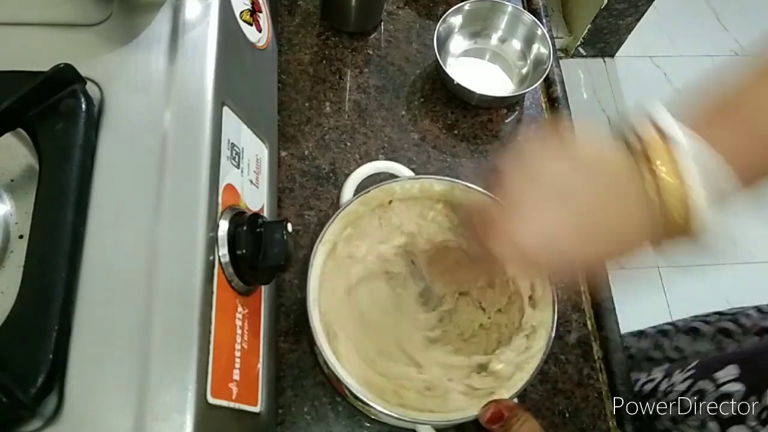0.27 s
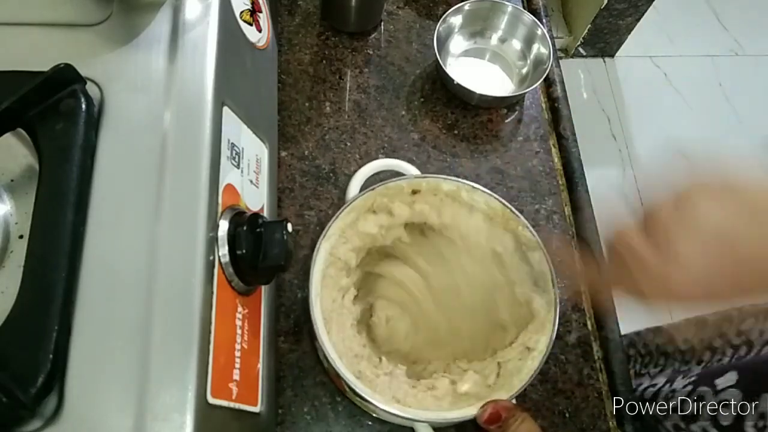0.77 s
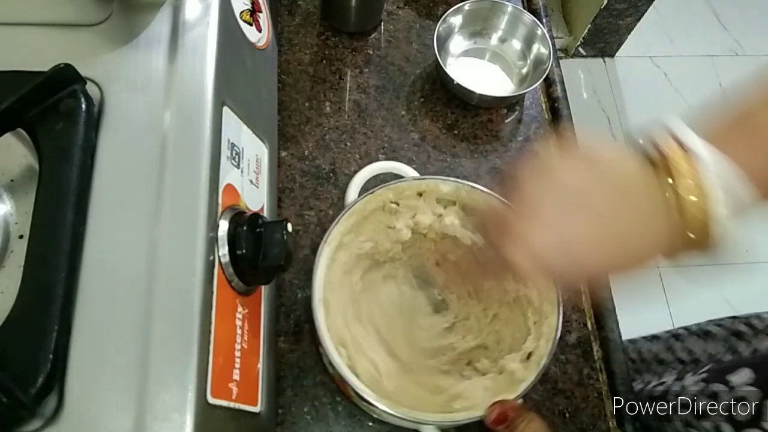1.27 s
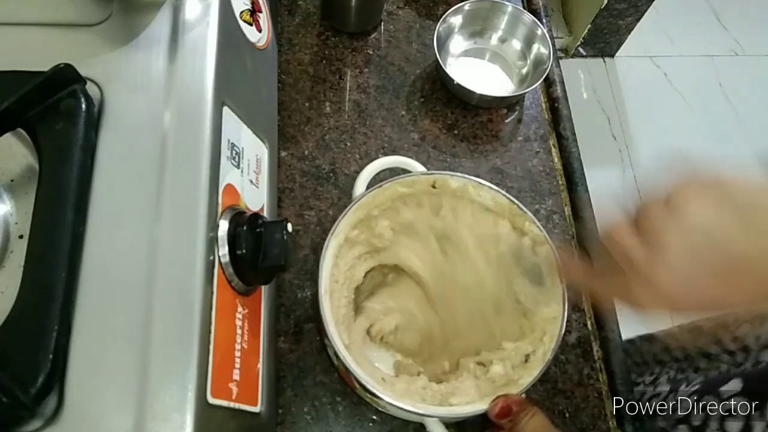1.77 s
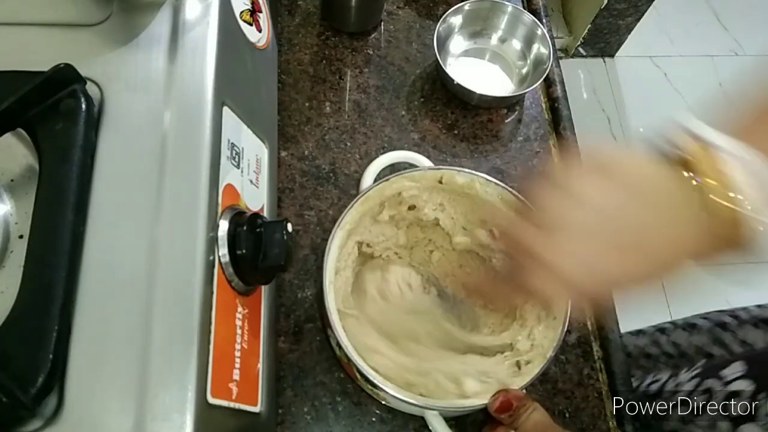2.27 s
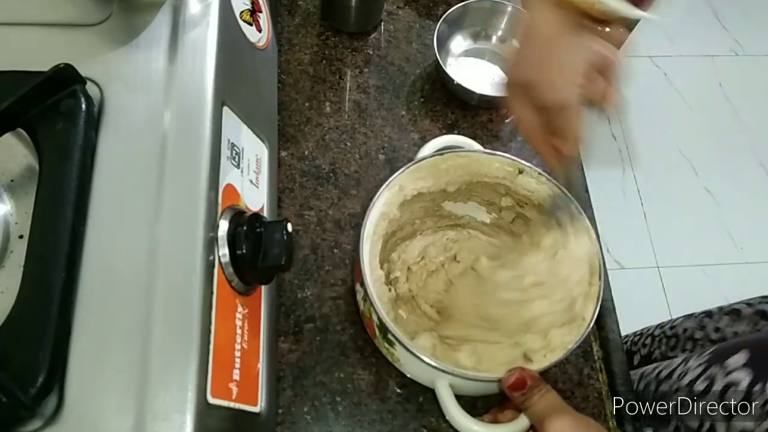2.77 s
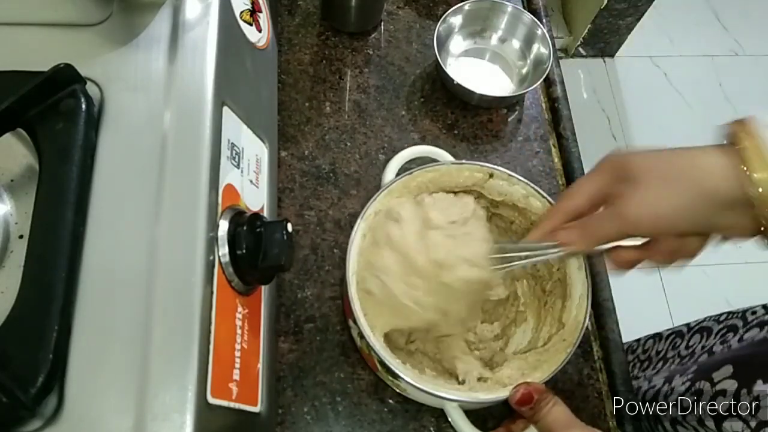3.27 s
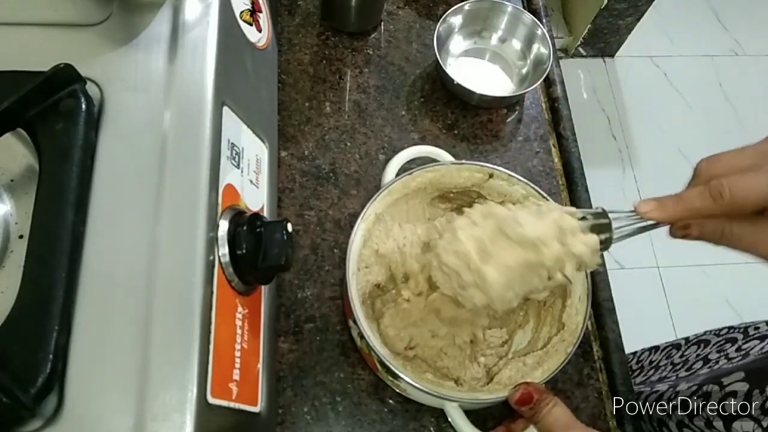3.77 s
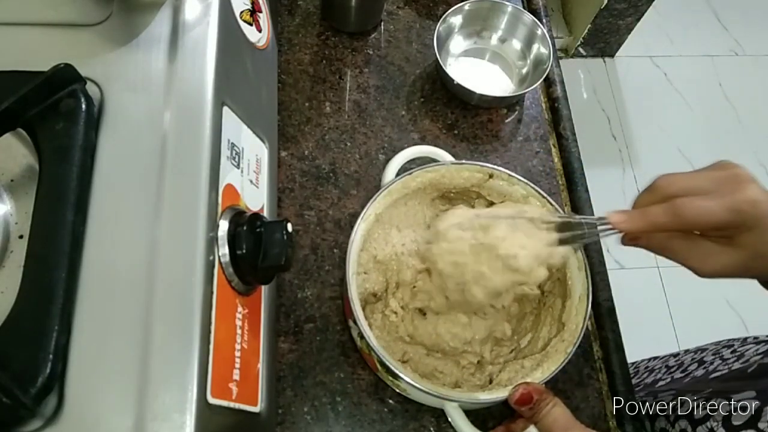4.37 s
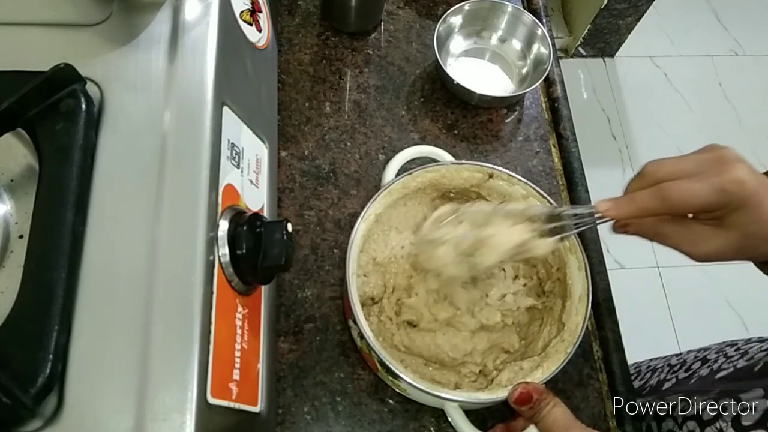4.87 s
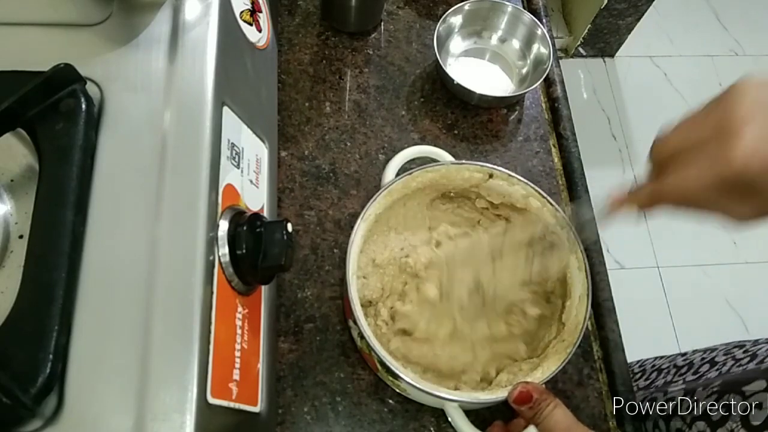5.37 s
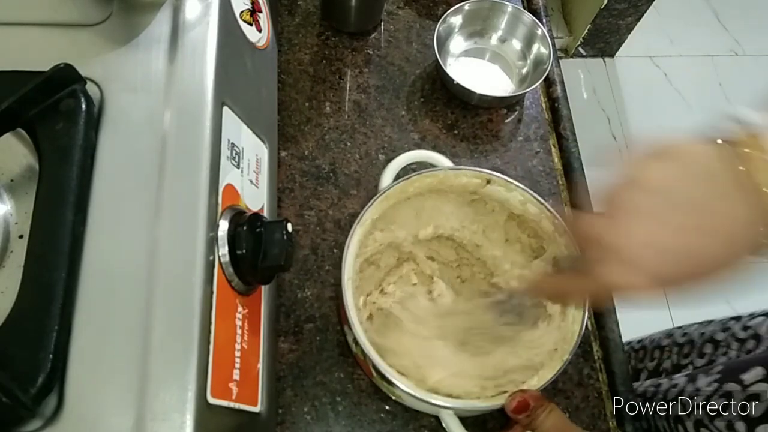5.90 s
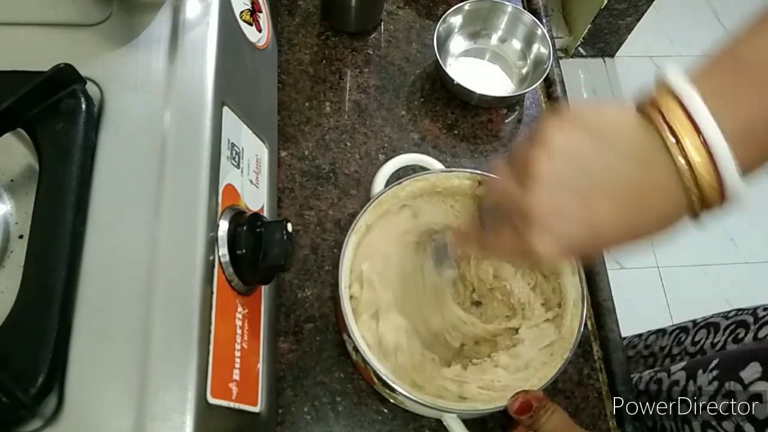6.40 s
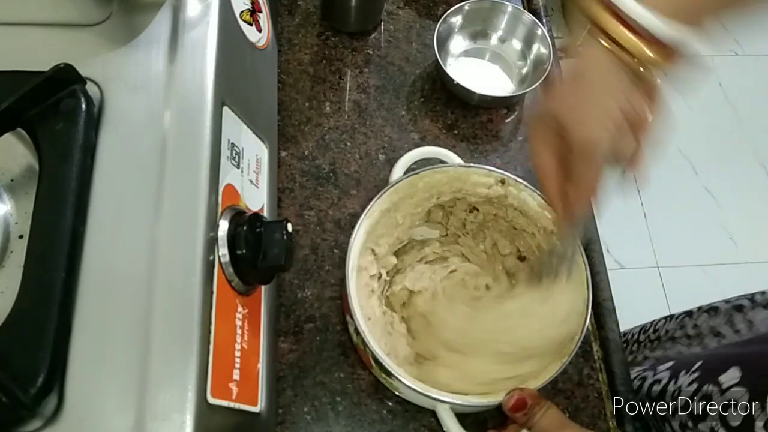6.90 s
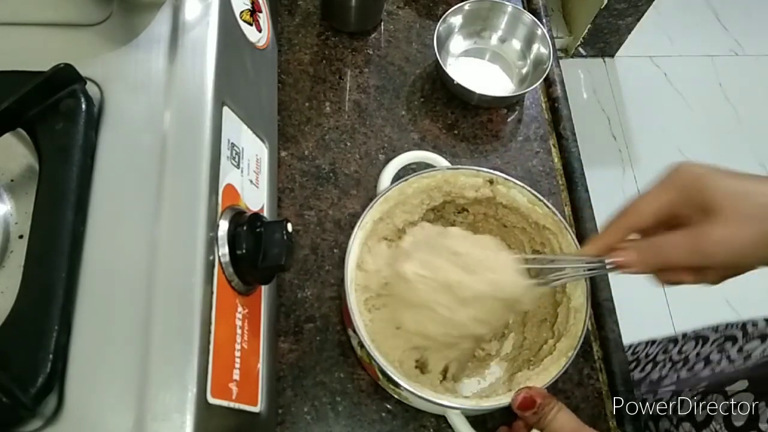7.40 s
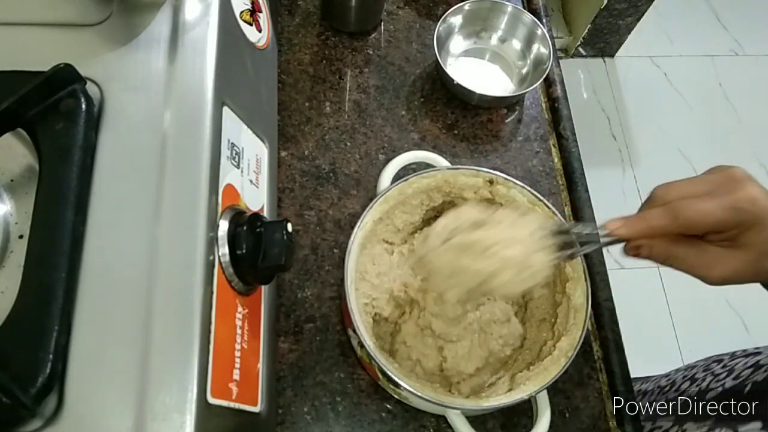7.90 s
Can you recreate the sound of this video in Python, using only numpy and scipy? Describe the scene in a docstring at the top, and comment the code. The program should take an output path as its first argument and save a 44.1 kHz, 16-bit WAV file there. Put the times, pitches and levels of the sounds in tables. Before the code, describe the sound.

Fast rhythmic whisking of heavy batter: low plops, gooey squelches, small pops and thin wire ticks, with hard bracelet clacks on top. The beating stops, leaving a quiet fridge hum and slight batter slides, broken by four evenly spaced steely knocks with dull thuds. The whisk scrapes the pot, circles again with two strong clacks, then lifts out. Close microphone, lively hard-walled kitchen.

```python
"""A wire whisk beats thick batter in a steel pot on a stone counter, about three turns a second, in a tiled kitchen.
Each turn plops (a decaying tone of falling pitch) and squelches (random grains, filtered and gated by the strokes).
Bangles on the beating wrist clack: short noise bursts with faint ringing modes; wires tick and scrape on the steel.
In a pause the loaded whisk is knocked clear with four jerks; a fridge hums in sine lines over a soft rush."""
import sys
import numpy as np
from scipy import signal
from scipy.fft import rfft, irfft
from scipy.io import wavfile
from scipy.ndimage import uniform_filter1d

SR = 44100
rng = np.random.default_rng(int(sys.argv[2]) if len(sys.argv) > 2 else 0)


def unload_wav(signal):
    """Save mono or channel-first audio to the path in sys.argv[1] as 16-bit WAV at rate SR, clipped to [-1, 1]."""
    wavfile.write(
        sys.argv[1],
        SR,
        np.round(np.clip(np.atleast_2d(signal).T, -1, 1) * 32767).astype(np.int16),
    )


N = 359363
TIME = np.arange(N) / SR

# Low thuds of whisk and pot: plunges into the batter, and from 4.6 to 5.2 s the thuds of the knocks.
# Each row: start in seconds, base level in dB, pitch in Hz to which the tone falls,
# base level of the wet slap in dB relative to the thud.
LOW_THUDS = [(0.045, -30, 442, 0.5), (0.372, -21.5, 439, -7.5), (0.716, -25, 427, -28),
             (0.804, -21.5, 434, -3.5), (1.054, -27.5, 478, -3.5), (1.374, -29.5, 505, -19),
             (1.469, -35, 356, -5), (1.715, -32, 325, -18.5), (2.041, -34, 490, 4), (2.092, -28, 420, -5),
             (2.124, -29.5, 376, -6), (2.523, -38.5, 310, 7.5), (2.926, -36, 280, -19),
             (4.609, -29.5, 270, -8.5), (4.812, -29, 298, -9.5), (4.994, -26.5, 295, -4.5),
             (5.163, -28, 269, -13.5), (6.081, -32, 425, -14.5), (6.47, -36.5, 484, -1.5),
             (6.83, -42.5, 400, -22)]
# The whisk circling in the batter. Each row: start in seconds, end in seconds,
# base level of the squelch in dB, base level of the wet crackle in dB.
CIRCLING_BOUTS = [(0, 3.13, -56, -54.5), (5.779, 7.2, -62.5, -56)]
# Spectrum of wire contacts. Each row: frequency in Hz, relative level in dB.
WIRE_COLOUR = [(40,-62),(300,-26.5),(1500,-15.5),(2600,-11.5),(4100,-2),(5200,-8.5),(7400,9.5),(9000,-3),(11000,-20.5),(15500,-38)]
# a pull takes hold at once; a bout dies away as the batter closes behind the wires
PULL_ATTACK_S, BOUT_T60_S = 0.014, 0.43


def undb(db):
    """Level law: decibels to amplitude gain."""
    return 10 ** (np.asarray(db) / 20)


def unit(x):
    """Power normalisation: scale to rms 1."""
    return x / np.sqrt(np.mean(x ** 2))


def fade(t, t60):
    """Exponential decay: amplitude falls by 60 dB in t60, in the unit of t."""
    return np.exp(-np.log(1000) * t / t60)


def add(track, s, sound):
    """Superposition: mix a sound into the track from s seconds on."""
    start = max(int(s * SR), 0)
    track[start:start + len(sound)] += sound[:max(N - start, 0)]


def on_log_axis(hz, points):
    """Log-frequency interpolation of (Hz, value) points."""
    points = np.array(points)
    return np.interp(np.log(np.maximum(hz, 1)), np.log(points[:, 0]), points[:, 1])


def colour(x, points, tilt=0, size=1024):
    """Minimum-phase filtering: a causal response with the given spectrum, tilted in dB per octave above 2 kHz."""
    hz = np.fft.rfftfreq(size, 1 / SR)
    db = on_log_axis(hz, points) + tilt * np.log2(np.maximum(hz, 2000) / 2000)
    # folding the cepstrum onto positive time makes the response causal
    cepstrum = irfft(np.log(undb(db)))
    cepstrum[1:size // 2] *= 2
    cepstrum[size // 2 + 1:] = 0
    response = irfft(np.exp(rfft(cepstrum)))
    return signal.fftconvolve(x, response)[:len(x)]


def resonate(x, hz, width_hz):
    """Damped resonance: one peak filter, applied twice for steep sides."""
    b, a = signal.iirpeak(hz, hz / width_hz, fs=SR)
    return signal.lfilter(b, a, signal.lfilter(b, a, x))


def walk(rate):
    """Slow random modulation: random values, rate per second, joined smoothly and scaled to rms 1."""
    k = int(SR / rate)
    steps = np.repeat(rng.standard_normal(N // k + 1), k)
    return unit(uniform_filter1d(steps, k)[:N])


def grains(rate, spread_db):
    """Shot noise: random single impulses, a few of them much larger than the rest."""
    sizes = undb(spread_db * np.minimum(rng.exponential(size=N), 4.5))
    return (rng.random(N) < rate / SR) * sizes * rng.choice([-1, 1], N)


def shifting(rate, spread_db, own_db, count=9):
    """Independent band modulation: each band of the grains swells and sinks by itself as gaps open and close."""
    source = grains(rate, spread_db)
    edges = np.geomspace(100, 16000, count + 1)
    total = np.zeros(N)
    for band in zip(edges[:-1], edges[1:]):
        sos = signal.butter(2, band, "band", fs=SR, output="sos")
        total += signal.sosfilt(sos, source) * undb(own_db * walk(30))
    return total


def crack(points, t60, tilt=0, size=2048, count=4):
    """Hard impact: brief chatter with an even spectrum, then coloured and scaled to a fixed energy."""
    decay = fade(TIME[:size], t60)
    burst = rng.standard_normal(size)
    for _ in range(count):
        # keep only the phases, so that every frequency is equally strong
        phase = np.angle(rfft(np.sign(burst) * decay))
        burst = irfft(np.exp(1j * phase))
    burst = colour(burst * np.sqrt(decay), points, tilt)
    return burst / np.sqrt(np.sum(burst ** 2) / 10)


def bubble(hz, cycles):
    """Bubble resonance: an air pocket bursting in thick batter gives a few cycles that rise a little."""
    turns = hz * TIME[:SR // 20]
    return np.sin(2 * np.pi * turns * (1 + 0.12 * turns / cycles)) * fade(turns, cycles)


def swell(start, length, attack_s, t60):
    """Movement envelope: linear attack, hold and exponential release."""
    return np.clip((TIME - start) / attack_s, 0, 1) * fade(np.maximum(TIME - start - length, 0), t60)


def circling():
    """Gating by motion: 1 while the whisk goes round in the batter, dying towards 0 when it is lifted."""
    return sum(swell(start, end - start, PULL_ATTACK_S, BOUT_T60_S) for start, end, _, _ in CIRCLING_BOUTS)


def slipping():
    """Gravity-driven sliding: gain of the lumps leaving the lifted whisk."""
    # Each row: start in seconds, length in seconds, base level in dB.
    sliding_lumps = [(3.419, 0.42, -69), (4.058, 0.081, -66.5), (4.47, 0.26, -73), (5.499, 0.35, -74.5),
                     (7.225, 0.28, -63), (7.639, 0.16, -64.5)]
    attack_s, t60_s = 0.02, 0.2
    return sum(undb(db) * swell(s, length, attack_s, t60_s) for s, length, db in sliding_lumps)


def stirring():
    """Work against viscosity: gains of squelch and crackle, steady in each bout, surging with each pull."""
    # Strokes through the thick of the batter. Each row: start in seconds, length of the pull in seconds,
    # base level of the squelch in dB, base level of the wet crackle in dB.
    pull_strokes = [(.042, 0.062, -45, -45), (.37, 0.095, -47.5, -47), (.713, 0.049, -46, -46.5),
                    (1.05, 0.059, -45, -47), (1.383, 0.076, -46.5, -51), (1.712, 0.071, -45, -48),
                    (2.043, 0.047, -47.5, -51), (2.52, 0.025, -53, -47), (2.922, 0.34, -53.5, -59.5),
                    (6.086, .11, -48, -44.5), (6.467, .11, -47.5, -51), (6.92, 0.29, -51.5, -64.5)]
    pull_t60_s = 0.54
    steady = sum(np.outer(undb(dbs), swell(start, end - start, PULL_ATTACK_S, BOUT_T60_S))
                 for start, end, *dbs in CIRCLING_BOUTS)
    pulls = sum(np.outer(undb(dbs), swell(s, length, PULL_ATTACK_S, pull_t60_s))
                for s, length, *dbs in pull_strokes)
    return np.hypot(steady, pulls)


def fridge(air_db=-60, waver_db=1):
    """Tonal machine noise: wavering compressor lines over a soft rush with a whistling band near 2 kHz."""
    # Level of the hum. Each row: time in seconds, level in dB.
    hum_level = [(0,-56),(5.3,-55.5),(8.15,-62)]
    # Compressor lines. Each row: frequency in Hz, level in dB relative to the hum level.
    hum_lines = [(74.4,-3.5),(121.8,-4.5),(100,-19),(226,-15),(247,-14)]
    # Spectrum of the rush. Each row: frequency in Hz, relative level in dB.
    air_colour = [(25,-14),(42,-13),(70,-8),(130,-1),(240,-4),(380,-8.5),(700,-13.5),(950,-32.5),(1150,-32),(1450,-42),(1800,-21.5),(2120,-11),(2550,-40),(4000,-60),(8000,-52.5),(15000,-69.5)]
    hum = np.zeros(N)
    for hz, db in hum_lines:
        gain = undb(db + waver_db * walk(3.3)) * np.sqrt(2)
        hum += gain * np.sin(2 * np.pi * hz * TIME + 0.15 * walk(6.7))
    shape = undb(on_log_axis(np.fft.rfftfreq(N, 1 / SR), air_colour))
    air = irfft(rfft(rng.standard_normal(N)) * shape, N)
    return undb(np.interp(TIME, *np.transpose(hum_level))) * hum + undb(air_db) * unit(air)


def kitchen(x, build_s=0.0005, early_db=3.5, early_t60=0.04, count=10, size=16384):
    """Diffuse reverberation: dense noise echoes, stronger early on, each band decaying at its own rate."""
    # Decay of the tiled room. Each row: frequency in Hz, t60 in seconds.
    room_decay = [(100,0.93),(400,0.65),(1400,0.99),(4000,0.6),(7000,0.73),(10000,0.38),(15000,0.6)]
    t, hz = TIME[:2 * size], np.fft.rfftfreq(2 * size, 1 / SR)
    centres = np.geomspace(100, 16000, count)
    bands = np.array([np.interp(hz, centres, share) for share in np.eye(count)])
    decay = fade(t, on_log_axis(centres, room_decay)[:, None])
    decay = decay * np.minimum(t / build_s, 1) ** 2 * undb(early_db * fade(t, early_t60))
    out = np.zeros(N)
    # the hand keeps moving, so the fine pattern of echoes changes from turn to turn
    for centre in range(0, N + size // 2, size // 2):
        near = np.arange(max(centre - size // 2, 0), min(centre + size // 2, N))
        response = np.sum(irfft(rfft(rng.standard_normal(len(t))) * bands) * decay, axis=0)
        response /= np.sqrt(np.sum(response ** 2))
        part = x[near] * np.cos(np.pi * (near - centre) / size)
        add(out, near[0] / SR, signal.fftconvolve(part, response))
    return out


def bangles(clack_db=0, clack_t60=0.021, ring_db=-41, rattle_per_s=160):
    """Modal ringing after impact: each clack excites the modes differently; a fast rattle modulates the ring."""
    # Clacks. Each row: start in seconds, level in dB, brightness in dB per octave above 2 kHz.
    bangle_clacks = [(0.1075, -11, 1), (0.1122, -7.5, 4), (0.4376, -11.5, 2.1), (0.4492, -6.5, 3.3),
                     (0.4583, -22, 0.5), (0.7742, -18, 3), (0.7889, -11.2, -1.3), (0.8057, -30.5, -14.5),
                     (1.1001, -13.5, 5.0), (1.1261, -26, -8), (1.3866, -25, -5), (1.4422, -13, 2.5),
                     (1.4585, -12.5, 3.5), (1.7821, -12.5, 5), (2.1167, -13.5, 2.5), (2.1244, -8.5, -1),
                     (2.433, -17.5, 2.5), (2.4648, -16, 1), (6.128, -6, 4.5), (6.4944, -28.5, 3),
                     (6.5063, -5.5, 3.5), (6.518, -19.5, -4)]
    # Ringing modes. Each row: centre of the random frequency in Hz, base level in dB, t60 in seconds.
    ring_modes = [(4050,-15.5,0.13),(5660,16.5,0.4),(5500,-8,0.23),(6960,11,0.13),(6850,5,.2),(7920,-14.5,.2),(8210,-6.5,.2),(9000,-9,.25),(8900,-13.5,.25),(12900,-6,.15)]
    # Spectrum of a clack. Each row: frequency in Hz, relative level in dB.
    clack_colour = [(40,-59),(150,-3),(500,-26),(1400,-17),(2700,-19),(3700,-12.5),(5200,-6.5),(6700,-1),(8000,-1),(9600,-6),(11200,-15.5),(13000,-15),(15500,-27)]
    out, rings, t = np.zeros(N), np.zeros(N), TIME[:SR // 2]
    for s, db, tilt in bangle_clacks:
        chance = rng.standard_normal((len(ring_modes), 2))
        ring = np.zeros(len(t))
        for (hz, mode_db, t60), (strength, detune) in zip(ring_modes, chance):
            tone = np.sin(2 * np.pi * hz * (1 + 0.008 * detune) * t)
            ring += np.tanh(strength) * undb(mode_db) * fade(t, t60) * tone
        add(out, s, undb(db + clack_db) * crack(clack_colour, clack_t60, tilt))
        add(rings, s, undb(db + ring_db) * ring / 2)
    return out + rings * walk(rattle_per_s)


def whisk_knocks(knock_db=0, knock_t60=0.015):
    """Heavily damped impact: short steel knocks, choked at once by the batter on the wires."""
    # Knocks that clear the whisk. Each row: start in seconds, level in dB.
    clearing_knocks = [(4.6115, -7.5), (4.8057, -26), (4.8121, -5.5), (4.9947, -20.5), (5.162, -8.5)]
    # Spectrum of a knock. Each row: frequency in Hz, relative level in dB.
    knock_colour = [(40,-82),(200,-27),(520,-10.5),(900,-28.5),(1700,-22.5),(2600,-30.5),(3700,-21),(4300,-12.5),(5300,-10.5),(5900,-6),(7500,-1),(8700,-13.5),(10700,-18.5),(15500,-37)]
    out = np.zeros(N)
    for s, db in clearing_knocks:
        add(out, s, undb(db + knock_db) * crack(knock_colour, knock_t60))
    return out


def pot_thumps(thump_db=-4.5, thump_hz=280, thump_t60=0.04):
    """Damped oscillation: every plunge and every knock of the whisk also thumps the pot against the counter."""
    out, t = np.zeros(N), TIME[:SR // 8]
    thump = np.sin(2 * np.pi * thump_hz * t) * fade(t, thump_t60) * (1 - fade(t, 0.0096))
    for s, db, _, _ in LOW_THUDS:
        add(out, s + rng.uniform(0, 0.008), undb(db + thump_db) * thump)
    return out


def scrapes(scrape_db=0):
    """Friction noise: a fine, bright rub swells and fades as the wires sweep round the bare pot wall."""
    # Sweeps. Each row: start in seconds, end in seconds, level in dB.
    wall_sweeps = [(5.716,6.062,-56),(6.823,7.02,-53)]
    # Spectrum of the rub. Each row: frequency in Hz, relative level in dB.
    rub_colour = [(500,-22),(2600,-10.5),(4500,1),(8000,3),(11000,-5.5),(13000,-10.5),(15500,-8)]
    sweep = np.zeros(N)
    for start, end, db in wall_sweeps:
        progress = np.clip((TIME - start) / (end - start), 0, 1)
        sweep += undb(db) * np.sqrt(np.abs(np.sin(np.pi * progress)))
    return undb(scrape_db) * sweep * unit(colour(grains(6000, 3.7), rub_colour))


def wire_ticks(tick_db=-1, tick_t60=0.014, stray_tilt=0.5):
    """Light random impacts: wires touch each other and the pot wall, by chance too while the whisk circles."""
    # The clearest ticks. Each row: start in seconds, base level in dB, brightness in dB per octave above 2 kHz.
    clear_ticks = [(0.373, -29, 8), (0.393, -23, 6.5), (0.7148, -27.5, -9), (0.7355, -25.5, 12),
                   (1.0546, -29, 17), (1.2313, -25, -5.0), (1.4003, -25, 4.5), (2.043, -31, 5),
                   (2.06, -25, -3), (2.351, -26, 0.5), (2.965, -27.5, 16), (3.156, -28.5, 2),
                   (3.422, -40.5, 13), (4.0628, -41, 0.5), (4.4744, -40, 15), (5.585, -37, 1.5),
                   (5.992, -25.5, 1), (6.0898, -24, -4.5), (6.3435, -33, -2.5), (7.1851, -47, 9),
                   (7.371, -47, 10), (7.6542, -33, -5.5)]
    stray_per_s, stray_db, stray_spread_db = 4, -31.5, 7
    out = np.zeros(N)
    for s, db, tilt in clear_ticks:
        add(out, s, undb(db + tick_db) * crack(WIRE_COLOUR, tick_t60, tilt))
    sizes = undb(stray_db + stray_spread_db * rng.uniform(-1, 1, N))
    touches = (rng.random(N) < stray_per_s / SR) * sizes
    return out + signal.fftconvolve(touches * circling(), crack(WIRE_COLOUR, tick_t60, stray_tilt))[:N]


def settling(settle_db=-5, flicker_db=4, cling_db=-66, pip_db=-6, pip_hz=6500, pip_octaves=0.3,
             pip_cycles=45, count=500):
    """Creep and bubble release: batter along the wires crackles faintly and pips, gated by turns and slides."""
    rustle = unit(colour(grains(600, 5.2), WIRE_COLOUR) * undb(flicker_db * walk(60)))
    pips = np.zeros(N)
    for when, pitch, size in rng.random((count, 3)):
        hz = pip_hz * 2 ** (pip_octaves * (2 * pitch - 1))
        add(pips, when * N / SR, undb(20 * size ** 2) * bubble(hz, pip_cycles))
    creep = undb(cling_db) * circling() + slipping()
    return creep * (undb(settle_db) * rustle + undb(pip_db) * unit(pips))


def pops(pop_db=-3, pop_t60=0.03, width=0.42):
    """Noise-excited resonance: larger air pockets tear open raggedly, each at its own pitch."""
    # The largest bursting pockets. Each row: start in seconds, base peak level in dB, pitch in Hz.
    bursting_pockets = [(.381,-28.5,3620),(.603,-40,1490),(.718,-32,1040),(.806,-26.5,3100),(1.057,-35,1740),(2.0437,-30,1784),(2.692,-34.5,3700),(2.924,-33.5,790),(2.931,-37.5,807),(6.774,-36.5,1480),(6.954,-37.5,3350),(7.106,-41,1350),(7.656,-34.5,4300),(7.802,-47.5,4190)]
    out, t = np.zeros(N), TIME[:SR // 20]
    for s, db, hz in bursting_pockets:
        tear = resonate(rng.standard_normal(len(t)) * fade(t, pop_t60), hz, width * hz)
        add(out, s, undb(db + pop_db) * tear / np.abs(tear).max())
    return out


def plops(plop_db=0, plop_t60=0.049, fall=0.38, fall_t60=0.018, churn_db=-12, churn_t60=0.14,
          churn_width_hz=290, slap_db=-7, slap_t60=0.13, low_hz=115):
    """Cavity resonance: pitch falls as a plunge's cavity widens, with churn and wet slap; knocks thud likewise."""
    # Spectrum of the wet slap. Each row: frequency in Hz, relative level in dB.
    slap_colour = [(40,-48.5),(120,-18),(350,20.5),(800,-11.5),(1400,0),(2000,-5),(2800,-4),(4500,-3),(7300,-11.5),(10000,-15.5),(15500,-30)]
    out, t = np.zeros(N), TIME[:SR // 3]
    for s, db, hz, wet_db in LOW_THUDS:
        turns = np.cumsum(hz * (1 + fall * fade(t, fall_t60))) / SR
        tone = np.sin(2 * np.pi * turns) * fade(t, plop_t60) * (1 - fade(t, 0.017))
        churn = unit(resonate(rng.standard_normal(len(t)), hz, churn_width_hz)) * fade(t, churn_t60)
        slap = unit(colour(rng.laplace(size=len(t)), slap_colour)) * fade(t, slap_t60)
        thud = undb(plop_db) * tone + undb(churn_db) * churn + undb(wet_db + slap_db) * slap
        add(out, s, undb(db) * thud)
    # so small a cavity radiates no deep bass
    return signal.sosfilt(signal.butter(4, low_hz, "high", fs=SR, output="sos"), out)


def batter(squelch_db=-4, bubble_db=-12, crackle_db=-3, slip_db=-1, flicker_db=1.2, band_db=3.0, count=1600):
    """Tearing of a viscous fluid: grains squelch and crackle as air pockets burst; sliding lumps squelch too."""
    # Spectra of squelch and crackle. Each row: frequency in Hz, relative level in dB.
    squelch_colour = [(40,-38.5),(90,-12.5),(200,1),(430,6.5),(650,-1),(900,4),(1150,0.5),(1450,1.5),(2000,-2),(2800,-16.5),(4200,-14),(7000,-9.5),(14000,-43.5)]
    crackle_colour = [(1000,-34.5),(2800,3),(4200,-2),(5500,2),(7400,0.5),(9300,4.5),(11000,-19),(15500,-36.5)]
    squelch = unit(colour(shifting(2500, 1.62, band_db), squelch_colour)) * undb(flicker_db * walk(45))
    crackle = unit(colour(shifting(1500, 3.5, band_db), crackle_colour)) * undb(flicker_db * walk(60))
    bubbles = np.zeros(N)
    for when, pitch, size in rng.random((count, 3)):
        add(bubbles, when * N / SR, undb(20 * size ** 2) * bubble(400 * 10 ** pitch, 14))
    low = undb(squelch_db) * squelch + undb(bubble_db) * unit(bubbles)
    squelch_gain, crackle_gain = stirring()
    return (squelch_gain + undb(slip_db) * slipping()) * low + crackle_gain * undb(crackle_db) * crackle


def scene(bangle_wet_db=1, knock_wet_db=-1.5, tick_wet_db=-1, pot_wet_db=-2, bounce_s=0.0019, bounce_db=-10):
    """Direct plus reverberant field: the bangles also bounce off the counter; the fridge is added dry."""
    clacks = bangles()
    wires = wire_ticks() + scrapes() + settling()
    pot = plops() + pot_thumps() + pops() + batter()
    sources = [(clacks, bangle_wet_db), (whisk_knocks(), knock_wet_db), (wires, tick_wet_db), (pot, pot_wet_db)]
    direct = sum(sound for sound, _ in sources)
    add(direct, bounce_s, undb(bounce_db) * clacks)
    echo = kitchen(sum(sound * undb(db) for sound, db in sources))
    return (direct + echo + fridge())[None]


def record(dry):
    """Band limiting: a steep elliptic low-pass removes the top of the treble."""
    top_hz = 15600
    return signal.sosfilt(signal.ellip(10, 0.2, 70, top_hz, fs=SR, output="sos"), dry)


dry = scene()
out = record(dry)
unload_wav(out)
```